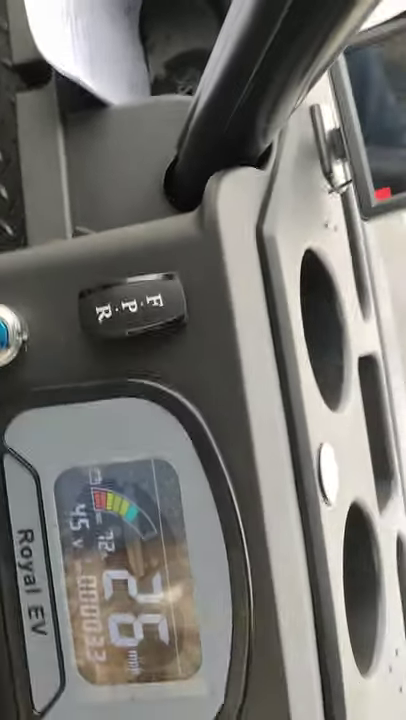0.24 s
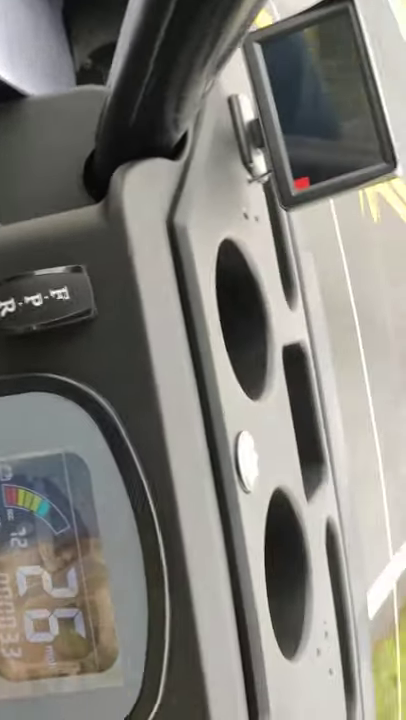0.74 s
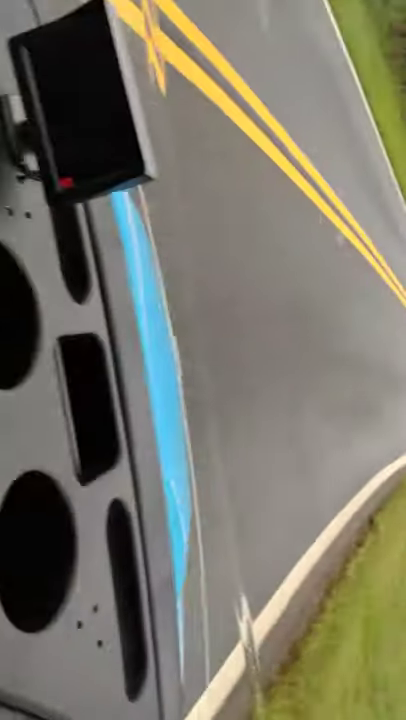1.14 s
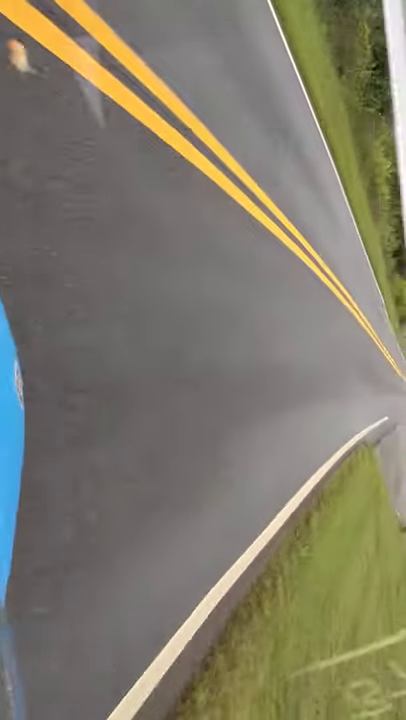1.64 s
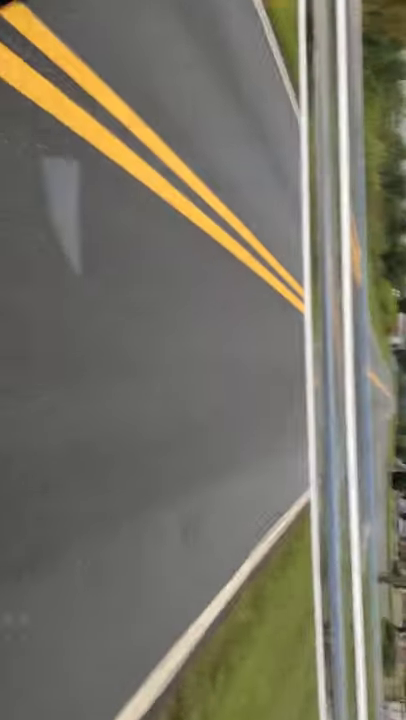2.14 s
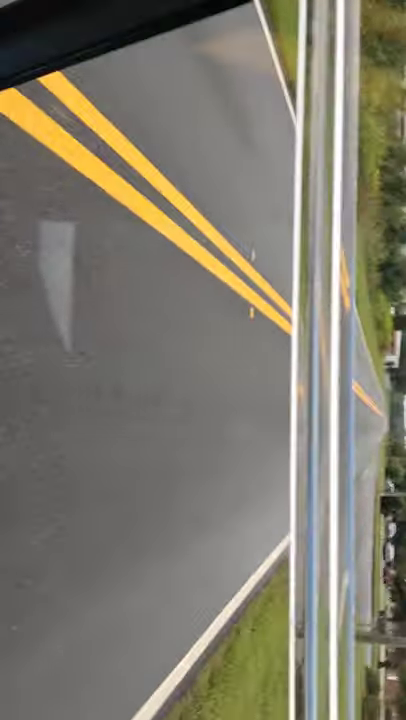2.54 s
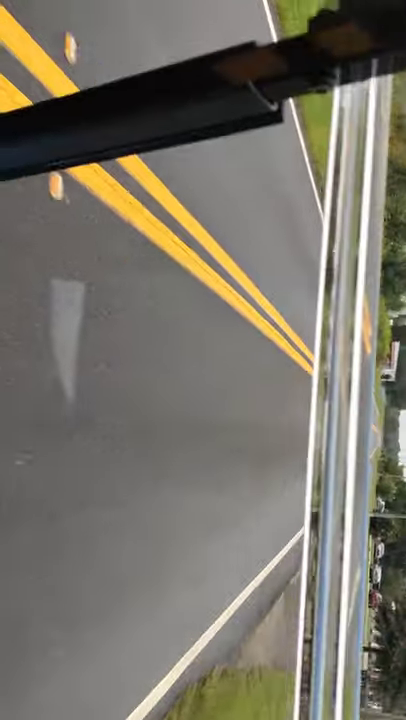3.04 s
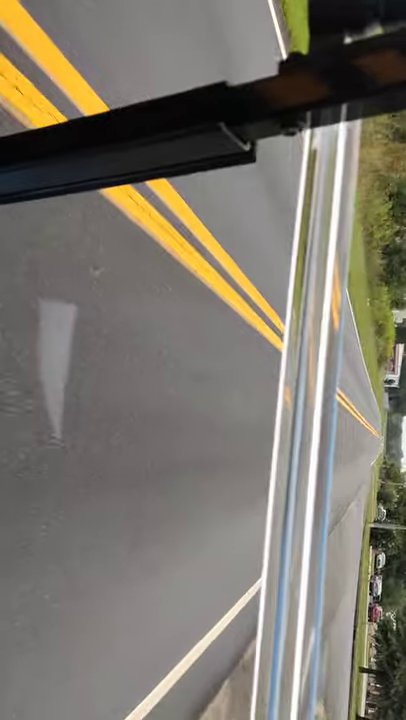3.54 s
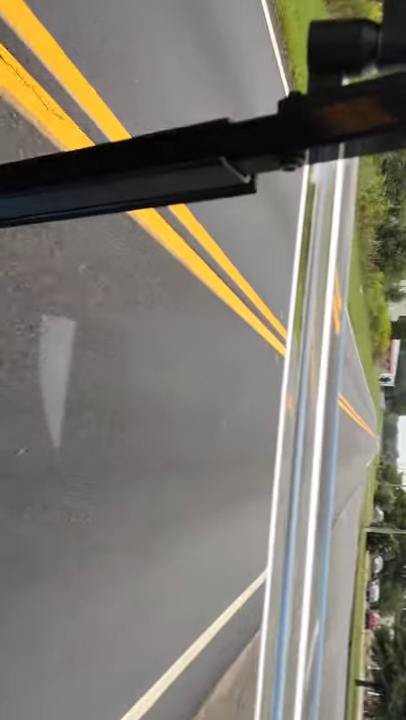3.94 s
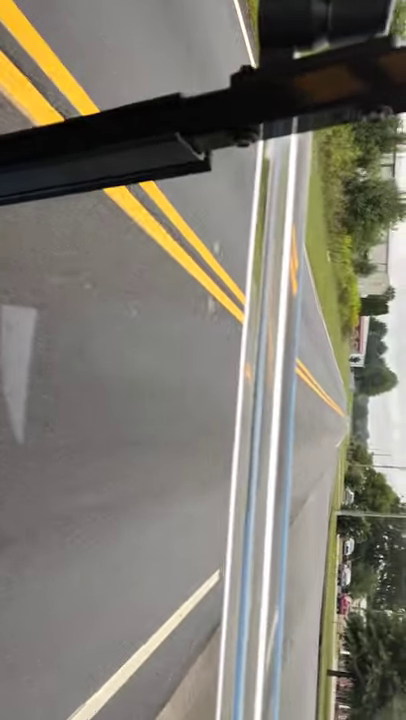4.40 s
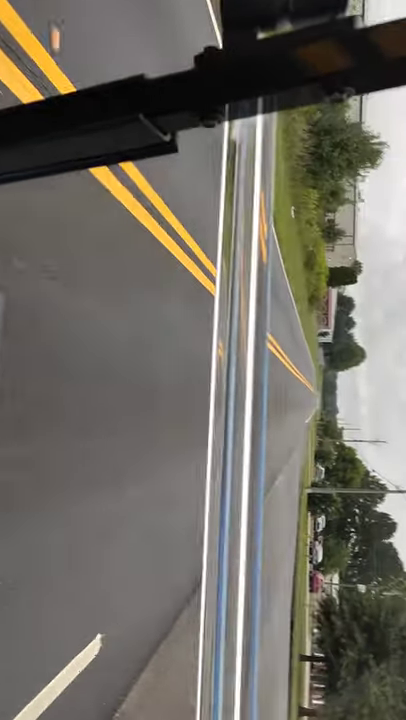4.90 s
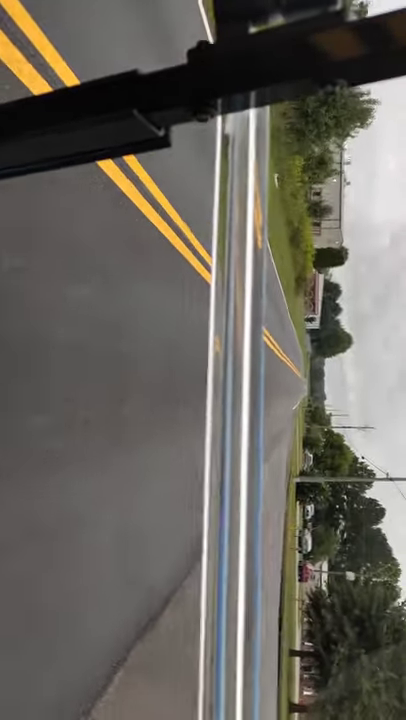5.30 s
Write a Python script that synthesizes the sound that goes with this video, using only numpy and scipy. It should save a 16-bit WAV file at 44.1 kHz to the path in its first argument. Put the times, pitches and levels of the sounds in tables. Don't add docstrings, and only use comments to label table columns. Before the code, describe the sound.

An electric cart rolls along pavement: wind buffeting at first, then a wavering low hum gliding downward as it slows, with faint rattles.

```python
import sys
import numpy as np
from scipy import signal
from scipy.fft import rfft, irfft, next_fast_len
from scipy.io import wavfile
from scipy.ndimage import uniform_filter1d

SR = 44100
rng = np.random.default_rng(int(sys.argv[2]) if len(sys.argv) > 2 else 0)


def field_ratio(decibels):
    return 10 ** (np.asarray(decibels, dtype=float) / 20)


def dump_mix(stems):
    frames = np.atleast_2d(stems).T
    limited = np.clip(frames, -1, 1)
    pcm = np.round(limited * 32767).astype(np.int16)
    wavfile.write(sys.argv[1], SR, pcm)


N = 245177
TIME = np.arange(N) / SR

# t/s, f/Hz, level/dB
INSECT_PASSES = [
    (1.5, 6700, -90),
    (1.9, 6650, -73),
    (2.2, 6560, -68),
    (2.7, 6330, -70),
    (3.2, 6300, -76),
    (3.9, 6350, -72),
    (5.0, 6550, -70.5),
    (5.56, 6400, -71),
]
# t/s, length/s, start f/Hz, end f/Hz, level/dB
CHIRP_GLIDES = [
    (0.8, 0.24, 5150, 5530, -68),
    (3.674, 0.2, 4650, 4570, -70.5),
]
# t/s, middle-range level/dB, treble level/dB
FRAME_TICKS = [(0.039, -32.5, -45), (0.1287, -42.5, -66), (.3297, -39, -65), (0.5181, -36.5, -46.5),
               (1.096, -56.5, -72), (1.891, -56, -64), (1.951, -50, -59), (2.1275, -47, -72),
               (2.404, -59, -62.5), (2.628, -54, -67), (2.9729, -32, -49), (4.0657, -48, -67),
               (4.397, -50, -65), (4.4487, -48.5, -56), (4.5246, -53, -59.5), (4.552, -49.5, -56),
               (4.6026, -44.5, -71), (4.6922, -46, -65), (4.857, -52, -55.5), (4.899, -41.5, -55.5),
               (4.9974, -50, -34.5), (5.0516, -40, -55.5), (5.0955, -44.5, -74.5), (5.1458, -44, -68),
               (5.189, -54, -66)]
# t/s, length/s, level/dB
LOOSE_RATTLES = [(.15, 0.75, -64.5), (1.746, 0.3, -63), (0.261, 0.062, -63.5), (0.588, 0.033, -58),
                 (1.641, 0.024, -59), (1.69, 0.031, -56), (1.806, 0.019, -58), (2.411, 0.017, -58.5),
                 (2.998, 0.1, -63.5), (4.078, 0.032, -59.5), (4.122, 0.029, -58), (4.15, 0.17, -59.5),
                 (3.15, 0.084, -62), (4.313, 0.038, -52)]
# t/s, length/s, level/dB
CONTROLLER_WHINE = [(1.8, .25, -75), (2.1, .2, -73), (2.37, .25, -71), (2.7, .2, -71), (3.0, .3, -74),
                    (3.35, .4, -72)]
# t/s, length/s, lower side band f/Hz, level/dB
CONTROLLER_HUNTING = [(3.572, 0.057, 7270, -71.5), (3.725, 0.28, 7870, -71), (4.15, 0.49, 7600, -76.5),
                      (4.25, 0.082, 7660, -63), (4.385, .14, 7320, -68.5), (4.9, 1.4, 7350, -74),
                      (5.15, 0.15, 7380, -73)]
# f/Hz, level/dB per Hz
RUMBLE_SPECTRUM = [(20, -21), (40, -3), (70, 0.5), (110, 0), (160, -12), (250, -17.5), (400, -16)]
# f/Hz, level/dB per Hz
FLUTTER_SPECTRUM = [(70, -15), (120, -7), (200, 5.5), (320, -1), (450, -9), (800, -28.5)]
# f/Hz, level/dB per Hz
GUST_TOP_SPECTRUM = [(300, -11), (500, 0), (750, -9.5), (1100, -15.5), (2000, -32.5)]
# t/s, length/s, rumble level/dB
WIND_EDDIES = [(.05, .14, -20.5), (.2, 0.099, -27), (.36, 0.2, -23.5), (.49, 0.09, -21), (.6, 0.017, -17.5),
               (.69, .16, -47), (.85, 0.18, -29.5), (.92, 0.043, -31), (1.19, 0.061, -32.5),
               (1.29, 0.14, -35.5), (1.5, 0.071, -29.5), (1.61, .16, -38.5), (1.88, 0.087, -39),
               (1.98, 0.076, -32), (2.19, .12, -39), (2.4, .14, -34), (2.56, 0.15, -30), (3.25, .08, -40),
               (3.38, .2, -38.5), (3.55, 0.054, -30), (3.94, 0.09, -37), (4.04, 0.033, -28),
               (4.2, 0.11, -31), (4.3, 0.028, -25.5), (4.4, 0.1, -38), (4.65, 0.25, -43), (4.95, 0.27, -36),
               (5.1, 0.047, -25.5), (5.23, 0.094, -32.5)]
# t/s, length/s, flutter level/dB, relative brightness level/dB
HARD_GUSTS = [(.0, .05, -20, -3.5), (0.063, .06, -20.5, -12), (0.139, 0.051, -18, -7.5),
              (0.238, 0.046, -26.5, -4), (0.297, .08, -27, -16), (0.358, 0.027, -24, 3.5),
              (.43, 0.14, -28, -5.5), (0.507, 0.065, -18.5, -13), (0.597, 0.016, -18, -7),
              (0.665, 0.061, -21.5, -15.5), (0.835, 0.038, -24.5, -10), (0.896, 0.034, -33, 0),
              (1.974, 0.05, -37.5, 3), (2.526, 0.033, -32.5, -13), (3.972, 0.028, -35, -10),
              (4.268, 0.036, -24, -12), (4.318, 0.016, -32.5, -14), (4.963, .06, -28.5, -9.5),
              (5.084, 0.034, -27, -2.5), (5.111, 0.021, -30, -8), (5.14, 0.035, -40, -18)]
# t/s, peak level/dB, f/Hz (negative for suction)
PRESSURE_KICKS = [(0.051, -12, -110), (0.135, -20, 163), (.137, -5.5, -110), (0.141, -5, 173),
                  (0.33, -9, 173), (0.402, -11, 115), (0.507, -9.5, 202), (0.608, -6, 176),
                  (0.651, -8.5, -170), (0.7, -11.5, 127), (0.845, -14, -150), (.89, -13, 81),
                  (5.0943, -10, 136), (5.103, -16, 237), (5.219, -16.5, 96)]
# f/Hz, level/dB per Hz
ROAR_FAST_SPECTRUM = [(18, -40), (30, -14.5), (109, -8.5), (155, -4.5), (178, -6.5), (209, -16), (249, -17),
                      (292, -14.5), (336, -15.5), (426, -10), (479, -5.5), (561, -14.5), (726, -8.5),
                      (958, -13.5), (3400, -44.5), (4420, -74), (7480, -120)]
# f/Hz, level/dB per Hz
ROAR_SLOW_SPECTRUM = [(18, -47.5), (30, -17.5), (70, -23), (118, -8.5), (149, -4), (221, -16), (329, -33),
                      (393, -11.5), (461, -15.5), (540, -12), (596, -21), (885, -18.5), (997, -26),
                      (1670, -32.5), (3400, -50.5), (4420, -87), (7480, -120)]
# f/Hz, level/dB per Hz
HISS_SPECTRUM = [(2500, -12.5), (3300, -16), (4000, -7.5), (4700, -3), (5500, -4.5), (6500, -6), (7300, -6),
                 (7900, -20.5), (8500, -9), (9000, -25.5)]
# t/s, length/s, level/dB
GEAR_LOAD = [
    (.1, 1.2, -63),
    (2.15, 1.1, -63),
    (3.1, 0.7, -69.5),
    (4.0, 1.2, -60.5),
]
# multiple of tread pitch [1], level/dB
GEAR_MULTIPLES = [(14.5, -2.5), (15.7, -7), (23.1, -14.5)]
# t/s, length/s, level/dB
TREAD_BEATS = [(.99, 0.054, -43.5), (1.16, 0.071, -32.5), (1.3, 0.076, -37), (1.51, 0.098, -29),
               (1.72, 0.2, -31.5), (1.92, 0.1, -32.5), (2.2, 0.37, -30.5), (2.42, 0.3, -32),
               (2.6, 0.098, -27.5), (2.88, 0.22, -29), (3.04, 0.092, -45), (3.41, 0.17, -32),
               (3.62, 0.22, -31), (3.8, 0.13, -32.5), (3.98, 0.12, -34.5), (4.05, 0.042, -36),
               (4.14, 0.16, -38.5), (4.45, 0.17, -29), (4.62, 0.49, -33.5), (4.92, 0.12, -25),
               (5.03, 0.022, -23.5), (5.12, 0.1, -27.5), (5.25, .15, -36), (5.5, 0.22, -25.5)]
# t/s, length/s, level/dB
TREAD_OVERTONES = [
    [(.6, 0.59, -39), (1.15, 0.7, -43), (2.59, 0.18, -39.5), (2.95, 0.12, -39), (3.27, 0.33, -43.5),
     (3.6, 0.89, -47), (4.1, 0.3, -46), (4.75, 0.65, -40), (5.3, 0.19, -39.5), (5.53, .1, -45)],
    [(.85, .15, -43.5), (1.15, 0.49, -47.5), (1.62, .3, -44), (1.98, 0.09, -39.5), (2.18, 0.26, -38),
     (2.85, 0.51, -46.5), (3.7, .8, -54)],
]

FULL_SPEED_HZ, LIFT_OFF_S, SLOWING_HZ_PER_S = 167.6, 1.4, 16.7
SWITCH_HZ = 8000


def rms_one(x):
    return x / np.sqrt(np.mean(x ** 2) + 1e-20)


def in_time(rows):
    s, *columns = np.transpose(rows)
    return [np.interp(TIME, s, c) for c in columns]


def drift(rate):
    r = np.exp(-80 * np.pi * rate / SR)
    noise = rng.standard_normal(N // 40 + 2002)
    slow = signal.lfilter([1], [1, -2 * r, r * r], noise)[2000:]
    return np.interp(np.arange(N) / 40, np.arange(len(slow)), rms_one(slow))


def band(x, low_hz, high_hz):
    return signal.sosfilt(signal.butter(2, [low_hz, high_hz], "band", fs=SR, output="sos"), x)


def coloured(spectrum, patchy_db, rate):
    size = next_fast_len(N, True)
    hz = np.maximum(np.fft.rfftfreq(size, 1 / SR), 1)
    points = np.array(spectrum)
    level_db = np.interp(np.log(hz), np.log(points[:, 0]), points[:, 1], left=-120, right=-120)
    shaped = rfft(rng.standard_normal(size)) * field_ratio(level_db)
    out, together = 0, drift(rate)
    for octave in range(4, 15):
        distance = np.clip(np.log2(hz) - octave, -1, 1)
        share = np.cos(np.pi / 2 * distance) ** 2
        if np.any(np.abs(shaped * share) > 1):
            flicker_db = patchy_db * (1.04 * together + 0.44 * drift(rate))
            out = out + irfft(shaped * share, size)[:N] * field_ratio(flicker_db)
    return rms_one(out)


def tone(hz):
    return np.sqrt(2) * np.sin(2 * np.pi * np.cumsum(hz) / SR + rng.uniform(0, 2 * np.pi))


def steady(hz):
    return np.full(N, hz)


def blur(width_hz):
    lowpass = signal.butter(2, width_hz, fs=SR, output="sos")
    return rms_one(signal.sosfilt(lowpass, rng.standard_normal(N)))


def evened(x, size):
    power = uniform_filter1d(uniform_filter1d(x ** 2, size=size), size=size)
    return rms_one(x / np.sqrt(power + 0.059))


def swells(rows, rest_db=-200):
    t = TIME[::32]
    power = sum(field_ratio(db) ** 2 * np.exp(-np.abs((t - s) / (length / 2)) ** 2.02) for s, length, db in rows)
    return np.interp(TIME, t, np.sqrt(power + field_ratio(rest_db) ** 2))


def tread_pitch():
    hz = FULL_SPEED_HZ - SLOWING_HZ_PER_S * np.maximum(TIME - LIFT_OFF_S, 0)
    return uniform_filter1d(hz, size=SR // 2, mode="nearest")


def insects():
    hz, db = in_time(INSECT_PASSES)
    near = np.clip((3.1 - TIME) / 0.4, 0, 1)
    stroke = np.sin(2 * np.pi * np.cumsum(41 * (1 + 0.03 * drift(3))) / SR)
    throb = 0.3 + np.maximum(stroke, 0) ** 2.2
    caller = rms_one(throb * (1.0 + blur(300)))
    blend = field_ratio(2.8 * drift(45)) * blur(380)
    buzz = near * caller + (1 - near) * blend
    return field_ratio(db) * (TIME > INSECT_PASSES[0][0]) * buzz * tone(hz)


def chirps():
    out = np.zeros(N)
    for s, length, start_hz, end_hz, db in CHIRP_GLIDES:
        part = np.clip((TIME - s) / length, 0, 1)
        envelope = (0.95 + 0.35 * blur(70)) * np.sin(np.pi * part)
        out += field_ratio(db) * envelope * tone(start_hz + (end_hz - start_hz) * part)
    return out


def frame():
    middle, treble, t = np.zeros(N), np.zeros(N), TIME[:SR // 50]
    for s, middle_db, treble_db in FRAME_TICKS:
        snap = (rng.standard_normal(len(t)) * 0.34 + (t == 0) * 3) * np.exp(-t / 0.0012)
        at = round(s * SR)
        middle[at:at + len(t)] += field_ratio(middle_db + 23) * snap
        treble[at:at + len(t)] += field_ratio(treble_db + 20) * snap
    ticks = band(middle, 680, 2130) + band(band(treble, 4700, 7600), 5100, 18000)
    struck = rng.random(N) < 4000 / SR
    clicks = struck * rng.standard_normal(N) * field_ratio(2.4 * rng.standard_normal(N))
    rattle = rms_one(band(clicks, 1500, 3100)) * 1.03 + rms_one(band(clicks, 4900, 8900)) * 0.82
    return ticks + swells(LOOSE_RATTLES) * rattle


def controller():
    out = field_ratio(-82.5 + 3.5 * drift(30)) * blur(60) * tone(steady(SWITCH_HZ))
    ping = [(1.59, 0.07, -68)]   # t/s, length/s, level/dB
    climbing_hz = 7180 + 288 * (TIME - 1.7)
    for rows, hz in ((ping, steady(7320)), (CONTROLLER_WHINE, climbing_hz)):
        upper = field_ratio(-4 + 1.5 * drift(9)) * tone(2 * SWITCH_HZ - hz)
        out += swells(rows) * field_ratio(-1.5 + 3.0 * drift(14)) * (tone(hz) + upper)
    flutter, low, high = field_ratio(2.5 * drift(35)), blur(120), blur(200)
    for s, length, hz, db in CONTROLLER_HUNTING:
        pair = low * tone(steady(hz)) + high * tone(steady(2 * SWITCH_HZ - hz))
        out += swells([(s, length, db)]) * flutter * pair
    return out


def wind():
    rumble = evened(coloured(RUMBLE_SPECTRUM, patchy_db=0.0, rate=4), size=SR // 25)
    out = swells(WIND_EDDIES, rest_db=-50.5) * field_ratio(-1.2) * rumble
    flutter = evened(coloured(FLUTTER_SPECTRUM, patchy_db=2.5, rate=87), size=SR // 50)
    top = coloured(GUST_TOP_SPECTRUM, patchy_db=1.0, rate=100)
    lumps_db = 3.3 * drift(40)
    gust = swells([row[:3] for row in HARD_GUSTS])
    bright = swells([(s, length, db + bright_db - 1.5) for s, length, db, bright_db in HARD_GUSTS])
    out += field_ratio(lumps_db - 3.12) * (gust * flutter + bright * top)
    lead = SR // 100
    for s, db, hz in PRESSURE_KICKS:
        turns = (TIME[:SR // 10] - lead / SR) * abs(hz)
        decay = np.exp(-np.abs(turns) / np.where(turns < 0, 0.2, 0.55))
        kick = np.sign(hz) * np.cos(2 * np.pi * turns) * decay
        kick = uniform_filter1d(kick, size=9)
        at = round(s * SR) - lead
        out[at:at + len(kick)] += field_ratio(db) * kick
    return out


def rolling():
    octaves = np.log2(tread_pitch() / FULL_SPEED_HZ)
    road_db, hiss_db = -37.5 + 12 * octaves, -72.5 + 2 * octaves
    slowing = np.pi / 2 * np.clip((TIME - 2.1) / 2.71, 0, 1)
    roar = np.cos(slowing) * coloured(ROAR_FAST_SPECTRUM, patchy_db=0.65, rate=21)
    roar += field_ratio(3.0) * np.sin(slowing) * coloured(ROAR_SLOW_SPECTRUM, patchy_db=0.54, rate=11)
    hiss = coloured(HISS_SPECTRUM, patchy_db=1.5, rate=29)
    thinning = np.clip(0.76 * octaves, -1, 0)
    hiss = hiss + thinning * band(hiss, 3600, 5900)
    return field_ratio(road_db + 4.5) * roar + field_ratio(hiss_db + 6.5) * hiss


def drivetrain():
    hz = tread_pitch()
    waver = hz * (1 + 0.00602 * drift(8.06))
    tread = swells(TREAD_BEATS, rest_db=-51) * field_ratio(0.56 * drift(13)) * tone(waver)
    for k, rows in enumerate(TREAD_OVERTONES):
        tread += swells(rows) * field_ratio((2.5 + 0.98 * k) * drift(9.8)) * tone((k + 2) * waver)
    gears = np.zeros(N)
    for multiple, db in GEAR_MULTIPLES:
        gears += field_ratio(db + 1.9 * drift(5.2)) * tone(multiple * hz * (1 + 0.0015 * drift(5.9)))
    unburied = np.clip(TIME / 0.9, 0, 1)
    return tread * unburied + swells(GEAR_LOAD) * gears


def scene():
    roadside = insects() + chirps()
    cart = frame() + controller() + rolling() + drivetrain()
    return (roadside + wind() + cart)[None]


def low_pass(x):
    return signal.sosfilt(signal.butter(12, 8800, fs=SR, output="sos"), x)


def record(dry):
    cut = signal.sosfilt(signal.butter(2, 28, "high", fs=SR, output="sos"), dry)
    cut = cut - 0.54 * signal.lfilter(*signal.iirpeak(4030, 5.0, fs=SR), cut)
    cut = signal.sosfilt(signal.cheby2(8, 50, 9600, fs=SR, output="sos"), cut)
    return low_pass(cut)


dry = scene()
out = record(dry)
dump_mix(out)
```